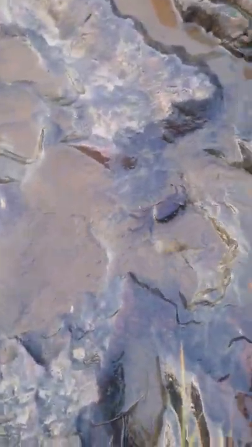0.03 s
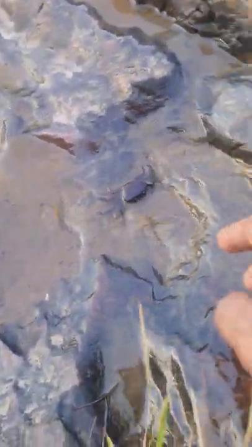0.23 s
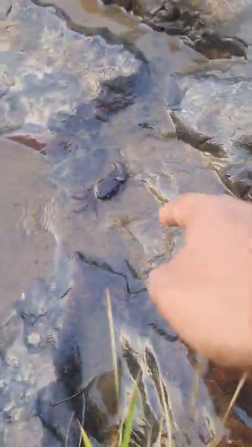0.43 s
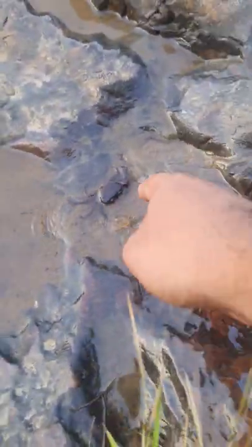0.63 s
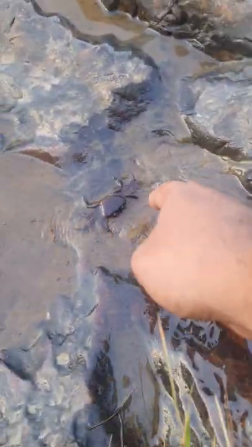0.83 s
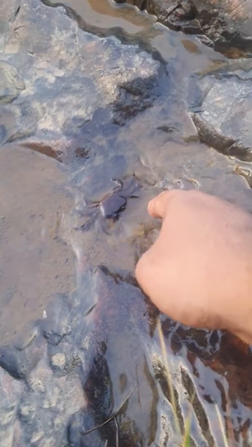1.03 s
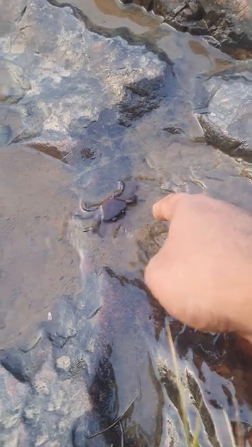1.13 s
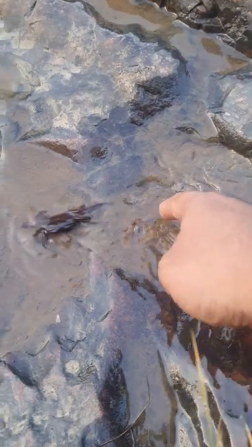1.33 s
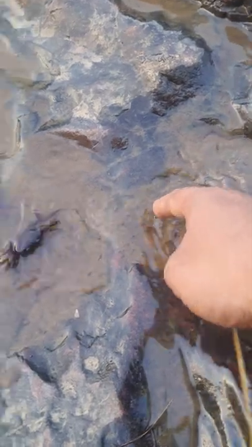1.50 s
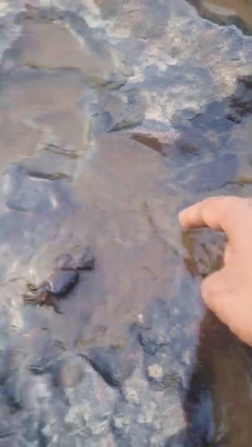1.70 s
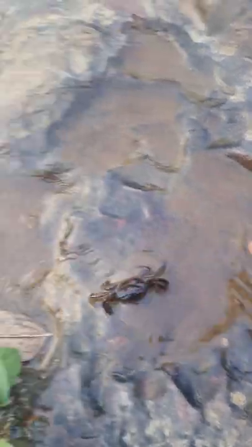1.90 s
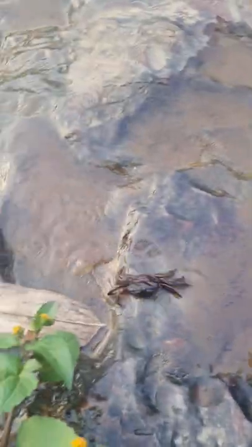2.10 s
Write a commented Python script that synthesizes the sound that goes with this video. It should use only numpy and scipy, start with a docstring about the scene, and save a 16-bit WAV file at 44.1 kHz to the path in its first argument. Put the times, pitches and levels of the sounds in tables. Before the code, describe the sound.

Two gritty hand scrapes on wet stone sound close to the microphone, one long and squeaky, one short and softer, among tiny wet ticks. Then quiet shallow water remains, with a faint insect and light wind on the microphone.

```python
"""Hand scrapes and small wet ticks

A hand makes two gritty strokes close to the right microphone, each a dense run of tiny slips; the first
has harder catches and hoarse squeaks. Small wet ticks fall around the strokes.
Shallow water hisses, an insect chirps faintly and air rumbles on the microphones."""
import sys
import numpy as np
from scipy import signal
from scipy.fft import rfft, irfft
from scipy.io import wavfile
from scipy.ndimage import uniform_filter1d

SR = 44100
rng = np.random.default_rng(int(sys.argv[2]) if len(sys.argv) > 2 else 0)


def to_wav(s):
    """Save 16-bit WAV."""
    ch = np.atleast_2d(s).T  # columns
    pcm = np.round(np.clip(ch, -1, 1) * 32767)  # PCM
    wavfile.write(sys.argv[1], SR, pcm.astype(np.int16))


N = 94815
T = np.arange(N) / SR
FREQS = np.arange(N // 2 + 1) * SR / N


def hand_strokes(slips_per_s=2200, slip_decay_s=.00025, smooth_share=.66, judder_hz=219.3):
    """Thousands of tiny slips a second roughen the rub of a slightly juddering hand."""
    # envelope of each stroke (time [s], relative level [dB], low rasp offset [dB], treble offset [dB])
    long_stroke = [(0, -68, -2, -1), (.09, -61, -3, -0.5), (.14, -51, -6, 3.5), (.204, -45, -5.5, 0),
                   (.238, -40.5, -1, 7.5), (.275, -33, -3.5, -3.5), (.325, -32.5, -3.5, -2),
                   (.406, -35, -1.5, .5), (.448, -27, -3.5, -1.5), (.492, -27, -3, -6.5),
                   (.548, -30.5, -3, 2.5), (.572, -34, -3, 1), (.612, -29, -5.5, -6),
                   (.642, -33, -1.5, -6.5), (.657, -46.5, 1.5, -9), (.672, -59, 0, -9)]
    short_stroke = [(.672, -61, 3, -11), (.82, -60.5, 1.5, -2), (.867, -46.5, -7, -8),
                    (.898, -43, -4.5, -8), (.917, -36.5, -5.5, -6.5), (.95, -38.5, 0, -7),
                    (.983, -41, -2.5, -4.5), (1.015, -59.5, 0, -6)]
    slips = rng.random(N) < slips_per_s / SR
    slip_power = undb(.5 * np.minimum(rng.exponential(size=N), 5)) ** 2
    power = signal.lfilter([1], [1, -np.exp(-1 / (slip_decay_s * SR))], slips * slip_power)
    grain = np.sqrt(smooth_share + (1 - smooth_share) * power / power.mean())
    grain = unit(grain * undb(.07 * walk(judder_hz)))
    envelopes = 0
    for stroke in (long_stroke, short_stroke):
        times, db, rasp, treble = np.array(stroke).T
        envelopes += np.array([curve(times, db + offset) for offset in (rasp, -1, treble + 1)])
    return shifting_contact(contact_noise(envelopes * grain))


def shifting_contact(rub, steps=12, low_hz=500, high_hz=8000, flare_db=1.73, flares_per_s=75):
    """The contact keeps changing, so every band but the top one flares and fades on its own."""
    position = np.clip(np.log(FREQS / low_hz + 1e-9) / np.log(high_hz / low_hz), 0, 1) * steps
    spectrum = rfft(rub)
    bands = [irfft(spectrum * np.maximum(1 - np.abs(position - k), 0), N) for k in range(steps + 1)]
    return bands[-1] + sum(band * unit(undb(flare_db * walk(flares_per_s))) for band in bands[:-1])


def contact_noise(envelopes, crossovers_hz=(3000, 8200), left_lag_s=.0004):
    """Friction noise under low, middle and treble envelopes; the left hears it late and scattered."""
    # colour of the rubbing (frequency [Hz], left gain [dB], right gain [dB])
    rub_eq = [(30, -31, -38), (100, -28, -13), (250, -22.5, -16.5), (415, -17.5, -13), (552, -21.5, -15.5),
              (930, -9, -2.5), (1350, -7, -1), (1550, -8.5, -3), (2020, -8, -1), (2700, -6.5, -6.5),
              (3150, -7.5, -8), (3740, -7, -1.5), (4630, -9.5, 1), (6270, -8, -6.5), (7050, -22.5, -4),
              (7830, -24, -11.5), (9200, -23.5, -8.5), (11370, -22, -3), (13350, -16.5, 4),
              (15800, -19, -7.5)]
    colour = response(rub_eq)
    coherence = .9 / np.sqrt(1 + (FREQS / 2340) ** 4)  # the two sides match only in the lows
    lag = np.exp(-2j * np.pi * FREQS * left_lag_s)
    lows, below_treble = [1 / (1 + (FREQS / hz) ** 16) for hz in crossovers_hz]
    out = 0
    for envelope, share in zip(envelopes, (lows, np.abs(below_treble - lows), 1 - below_treble)):
        right, scattered = rfft(envelope * rng.standard_normal((2, N)))
        left = coherence * right * lag + np.sqrt(1 - coherence ** 2) * scattered
        band = colour * np.sqrt(share)
        out += irfft(np.array([left, right]) * band, N) / np.sqrt(np.mean(np.abs(band) ** 2) / 2)
    return out


def squeaks(width_hz=480, sag_per_s=1.7, left_db=-18):
    """The slips lock to one hoarse pitch, which sags as the squeak swells and fades."""
    # moments of locked slipping (start [s], length [s], starting pitch [Hz], relative level [dB])
    locks = [(0.454, 0.082, 5230, -31), (0.545, 0.011, 1900, -31.5), (0.582, 0.039, 2280, -31)]
    out = 0
    for start, length, hz, db in locks:
        age = np.clip(T - start, 0, length)
        swell = np.sqrt(np.abs(np.sin(np.pi * age / length)))
        out += undb(db) * swell * rough_tone(hz * np.exp(-sag_per_s * age), width_hz)
    return 2 * out * undb([[left_db], [0]])


def grit_catches():
    """The sliding hand snags on grit with hard little clicks."""
    # snags, before the trim (time [s], low [dB], middle [dB], treble [dB])
    snags = [(.229, -51, -44, -30), (.267, -44, -44, -15.5), (.290, -37, -29, -32), (.3345, -49, -33, -18),
             (.360, -44, -40, -20), (.424, -56, -32, -15), (.455, -37, -16, -12), (.4585, -43, -27, -21),
             (.4975, -23, -25, -15), (.507, -38, -22, -28), (.541, -36, -40, -17), (.5505, -23, -23, -22),
             (.5795, -39, -19.5, -14), (.589, -30, -33, -35), (.642, -32, -37, -31)]
    return undb(-3.5) * clicks(snags, decay_s=.0013)


def wet_ticks():
    """Small wet ticks, with extra sparkle at the very top."""
    # ticks (time [s], low [dB], middle [dB], treble [dB])
    ticks = [(.0255, -56, -45, -41.5), (.034, -60, -48, -37), (.057, -49, -49, -42), (.0705, -36, -48, -45),
             (.114, -60, -40, -43), (.186, -48, -46, -37), (.7235, -43, -34, -51), (.7905, -58, -48, -39),
             (.8265, -49, -44, -40), (.853, -56, -48, -39), (.861, -58, -35, -32), (.8805, -49, -33, -33),
             (.8885, -56, -41, -32), (.9115, -36, -29, -33), (1.203, -68, -62, -49.5),
             (1.37, -68, -62, -48)]
    return clicks(ticks, decay_s=.0015, sparkle_db=8.5)


def clicks(hits, decay_s, sparkle_db=0, sparkle_hz=14300, low_cut_hz=700):
    """Sudden bursts of contact noise, each with its own colour; grit is too small to thud."""
    envelopes = sum(undb(dbs)[:, None] * (T >= start) * np.exp(-np.abs(T - start) / decay_s)
                    for start, *dbs in hits)
    bursts = low_cut(contact_noise(envelopes), low_cut_hz)
    shelf = undb(sparkle_db / (1 + (sparkle_hz / (FREQS + 1)) ** 10))
    return irfft(rfft(bursts) * shelf, N)


def shallow_water(flicker_db=.9, flickers_per_s=24.1, echo_s=.001688):
    """Flickering hiss, combed by reflections between close rock faces."""
    # colour of the hiss (frequency [Hz], left gain [dB], right gain [dB])
    hiss_eq = [(200, -20.5, -12), (360, -18.5, -13), (560, -21, -16.5), (970, -22, -22.5),
               (1560, -19, -15.5), (2380, -13.5, -13.5), (2650, -8.5, -11.5), (2820, -4, -8), (3820, 0, -3),
               (5340, -5.5, -6), (5880, -2.5, -6.5), (7380, -21, -9), (7730, -22, -18), (9600, -28.5, -24),
               (12500, -27.5, -18), (14500, -17.5, -14.5)]
    # slow drift of the water (time [s], relative level [dB])
    drift = [(0, -51.5), (.75, -54), (1.25, -53.5), (1.45, -55), (1.84, -55), (2.14, -53.5)]
    hiss = coloured_noise(hiss_eq) * undb(-flicker_db * walk(flickers_per_s))
    bounce = .5 * np.exp(-2j * np.pi * FREQS * echo_s) / (1 + (FREQS / 4700) ** 4)  # duller each trip
    combed = unit(irfft(rfft(hiss) / (1 - bounce), N))
    times, db = np.array(drift).T
    return combed * undb(np.interp(T, times, db) + 5)


def insect(wing_strokes=5, pitch_hz=7400, sag_hz_per_s=180000, spacing_s=.013, width_s=.0026,
           left_db=-30):
    """Each chirp is a quick run of short wing strokes falling in pitch, off to the right."""
    # chirps (time [s], relative level [dB])
    chirps = [(1.134, -51), (1.443, -51.5), (1.741, -53)]
    out = np.zeros(N)
    for start, db in chirps:
        for k in range(wing_strokes):
            age = T - start - k * spacing_s
            near = np.abs(age) < 4 * width_s
            cycles = pitch_hz * age[near] - sag_hz_per_s * age[near] ** 2 / 2 + rng.random()
            out[near] += undb(db) * np.exp(-(age[near] / width_s) ** 2) * np.sin(2 * np.pi * cycles)
    return 2 * out * undb([[left_db], [0]])


def air_rumble(floor_db=-61.5, puff_s=.036):
    """Air buffets the microphones in soft low puffs, partly shared by both sides."""
    # colour of the buffeting (frequency [Hz], left gain [dB], right gain [dB])
    rumble_eq = [(20, -60, -63), (37.4, -14, -14), (60, -18.5, -2), (87, -0.5, -2), (127, -13.5, -8),
                 (198, -29, -14), (430, -27.5, -31.5), (1470, -74, -97)]
    # puffs of air (peak time [s], level [dB])
    puffs = [(.11, -54.5), (.38, -51.5), (.80, -57), (.97, -58.5), (1.21, -57.5), (1.30, -59.5),
             (1.52, -61.5), (1.80, -62.5), (1.92, -57.5)]
    air = coloured_noise(rumble_eq)
    puff_power = sum(undb(db) ** 2 * np.exp(-((T - peak) / puff_s) ** 2) for peak, db in puffs)
    return unit(air + air.mean(0)) * np.sqrt(undb(floor_db) ** 2 + puff_power)


def undb(db):
    """Decibels to gain."""
    return 10 ** (np.asarray(db) / 20)


def unit(x):
    """Scale to rms 1 (a stereo pair by its mid signal)."""
    return x / np.sqrt(np.mean(np.atleast_2d(x).mean(0) ** 2))


def walk(rate):
    """Smooth random motion of rms 1, with `rate` new values a second."""
    hold = max(int(SR / rate), 1)
    steps = np.repeat(rng.standard_normal(N // hold + 1), hold)
    return unit(uniform_filter1d(steps, hold)[:N])


def response(eq):
    """Minimum-phase stereo response from (frequency [Hz], left gain [dB], right gain [dB]) points."""
    hz, *sides = np.array(eq, float).T
    log_gain = np.log(undb([np.interp(np.log(FREQS + 1), np.log(hz), side) for side in sides]))
    causal_fold = np.r_[1, np.full(N // 2, 2), np.zeros(N - N // 2 - 1)]
    return np.exp(rfft(irfft(log_gain, N) * causal_fold))


def coloured_noise(eq):
    """Unrelated left and right noise of the given colour."""
    return unit(irfft(rfft(rng.standard_normal((2, N))) * response(eq), N))


def curve(times, db):
    """Gain along a dB curve, silent outside it."""
    return undb(np.interp(T, times, db)) * (T >= times[0]) * (T <= times[-1])


def rough_tone(hz, width_hz):
    """A narrow band of noise, like a resonance kept ringing by random pushes."""
    phase = 2 * np.pi * np.cumsum(hz * np.ones(N)) / SR
    return unit(walk(width_hz) * np.cos(phase) + walk(width_hz) * np.sin(phase))


def low_cut(x, hz):
    """Roll off the bass at 12 dB an octave."""
    return signal.sosfilt(signal.butter(2, hz, "high", fs=SR, output="sos"), x)


def scene():
    """Scrapes and ticks up front, over a bed of water, air and insect."""
    hand = hand_strokes() + squeaks() + grit_catches()
    return hand + wet_ticks() + shallow_water() + air_rumble() + insect()


def record(dry):
    """The recorder cuts the deep bass and the very top."""
    high_cut = signal.ellip(12, .2, 80, 15950, fs=SR, output="sos")
    return signal.sosfilt(high_cut, low_cut(dry, hz=42))


dry = scene()
out = record(dry)
to_wav(out)
```